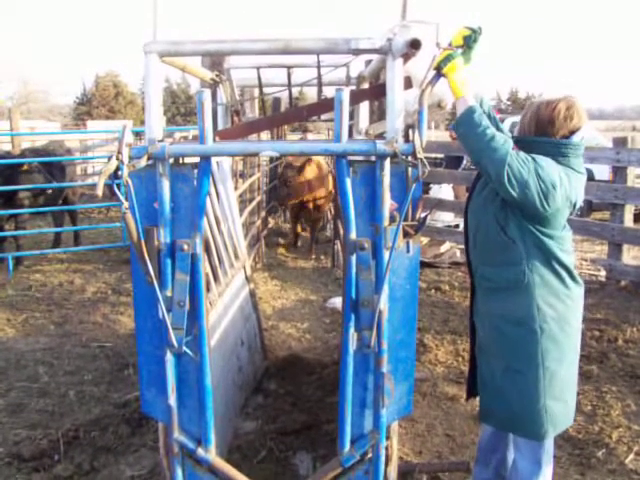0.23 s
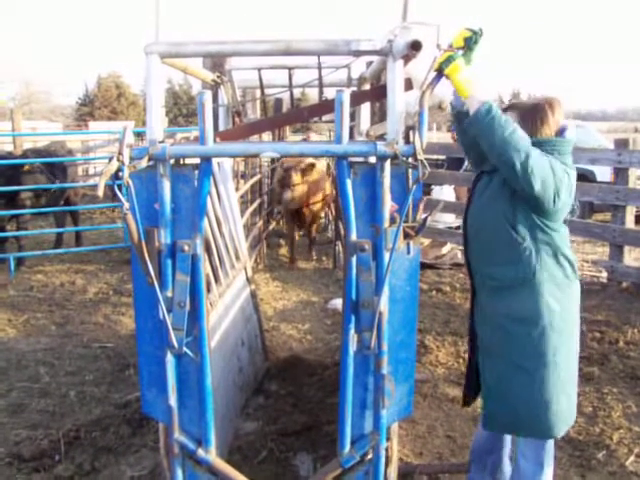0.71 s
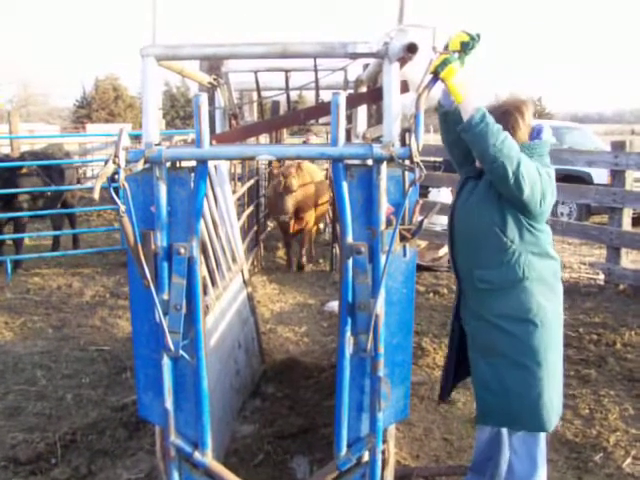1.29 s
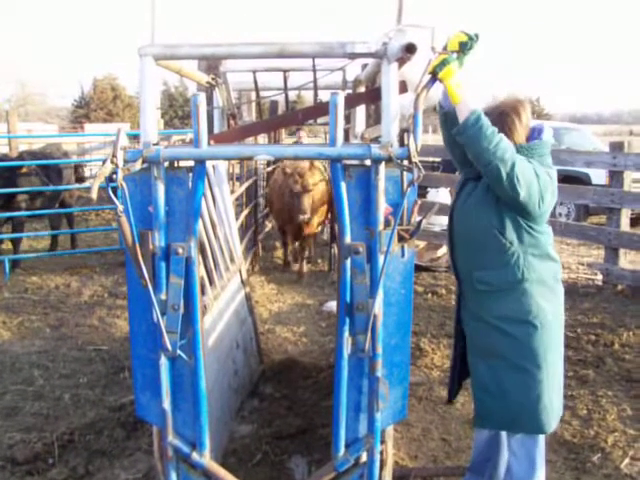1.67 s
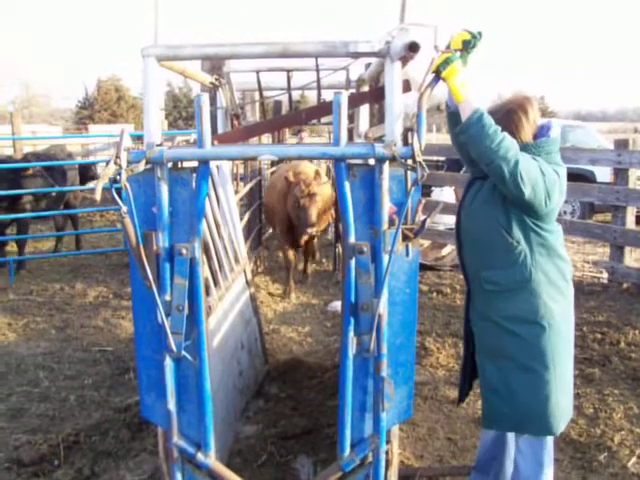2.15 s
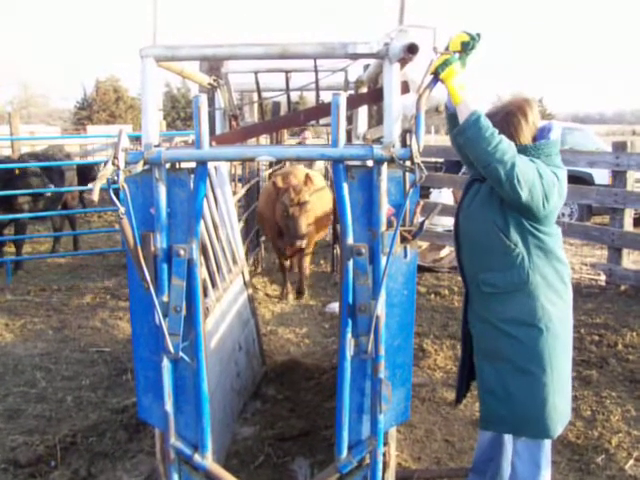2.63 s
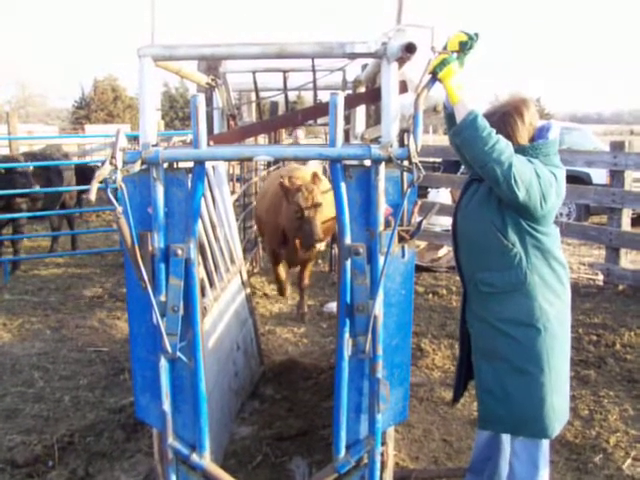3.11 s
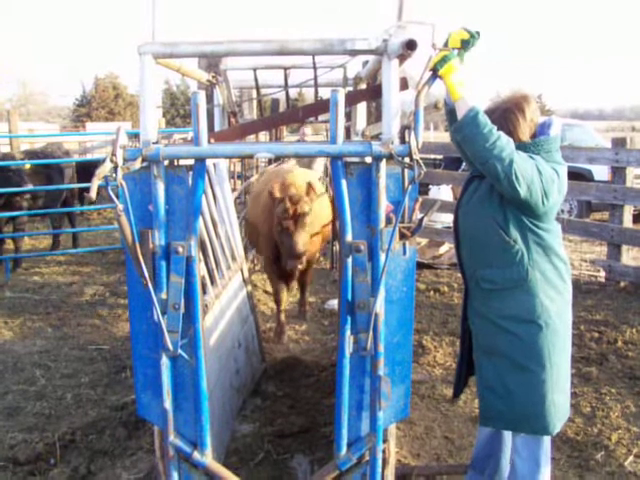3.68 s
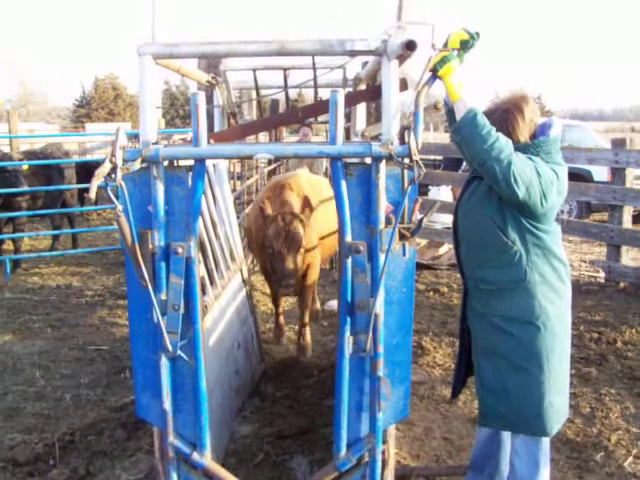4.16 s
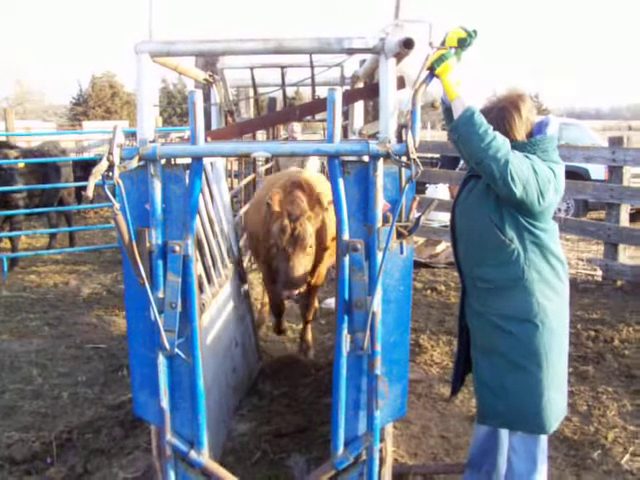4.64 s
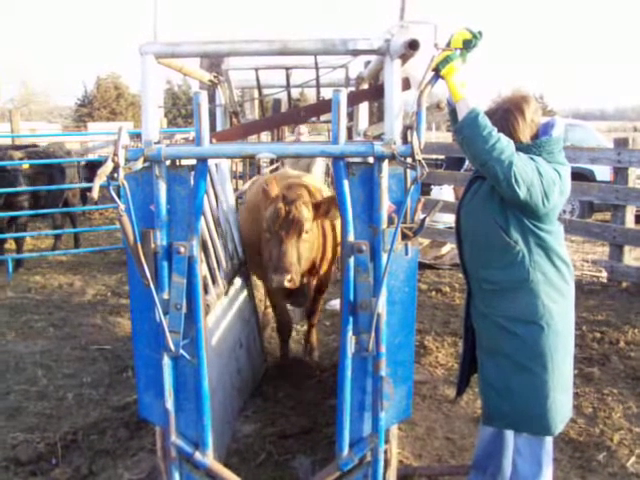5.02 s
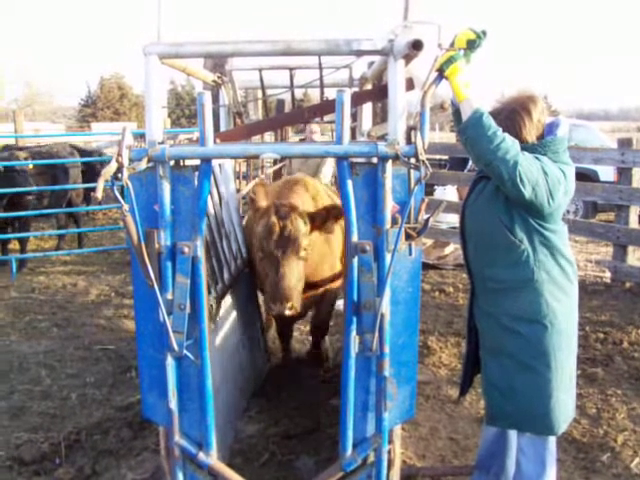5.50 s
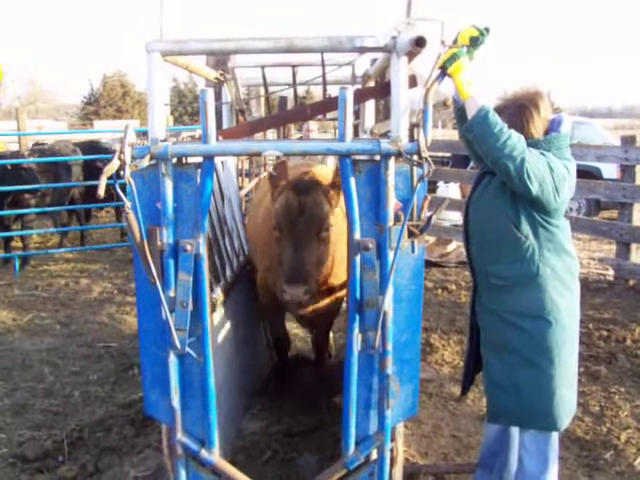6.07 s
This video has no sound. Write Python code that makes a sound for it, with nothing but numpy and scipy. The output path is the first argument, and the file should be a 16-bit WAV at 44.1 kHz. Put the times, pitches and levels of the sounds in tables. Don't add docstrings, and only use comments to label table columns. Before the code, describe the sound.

Low creaky moo, long rising moo breaking into a bellow, hard metal gate slam, latch chatter and a loud bang over a close moo.

```python
import sys
import numpy as np
from scipy import signal
from scipy.fft import rfft, irfft
from scipy.io import wavfile
from scipy.ndimage import uniform_filter1d

SR = 44100
rng = np.random.default_rng(int(sys.argv[2]) if len(sys.argv) > 2 else 0)


def voltage_ratio(level):
    return 10 ** (np.asarray(level, float) / 20)


def log_audio(samples):
    frames = np.atleast_2d(samples).T
    limited = np.clip(frames, -1, 1)
    pcm = np.round(limited * 32767).astype(np.int16)
    wavfile.write(sys.argv[1], SR, pcm)


N = 276948

# pitch_hz, density_db (per Hz)
YARD_SPECTRUM = [(59, -24), (100, 0.5), (378, -7), (423, -4.5), (456, -9), (615, -5), (650, -12),
                 (728, -12), (1210, -17), (1720, -16), (4820, -16), (8150, -26), (8780, -41.5),
                 (11400, -90), (19300, -120)]
# peak_s, width_s, level_db
GUSTS = [(.45, .2, 4.5), (1.75, .5, 5), (2.65, .35, 4.5), (5.2, .1, 7), (5.38, .25, 14), (5.6, .18, 15),
         (5.85, .2, 11), (6.3, .15, 7)]

# start_s, length_s, level_db, pitch_hz
SQUEAKS = [
    (.045, 0.046, -60, 5650),
    (.045, 0.051, -55, 4100),
    (1.42, 0.4, -61.5, 429),
    (.1, .02, -66, 5650),
    (.62, .05, -63, 4720),
]
# start_s, length_s, rms_db,
# pitch_hz, width_hz
SCUFFS = [(.04, 0.14, -55, 3700, 1200), (.29, .06, -49.5, 4630, 3000), (.35, 0.11, -58, 3500, 2000),
          (.62, 0.15, -59, 3700, 1200), (.78, .14, -58.5, 3750, 2000), (4.24, .13, -57, 3600, 700),
          (4.6, 0.24, -59, 3520, 2000), (4.91, 0.1, -46.5, 1460, 905), (4.97, 0.095, -56.5, 3700, 1200),
          (5.15, 0.03, -47, 4170, 4940), (5.225, 0.064, -49, 3000, 3000), (5.1, 0.27, -53.5, 940, 900),
          (5.3, 0.14, -44, 655, 150), (5.255, 0.12, -51, 2750, 3500), (5.885, .04, -36, 1000, 900),
          (6.21, .035, -36, 1300, 700), (6.215, .03, -42, 4200, 2000), (6.1, .025, -38, 2200, 700),
          (4.19, .03, -48, 1400, 1200), (5.85, .25, -53, 280, 120), (1.742, .014, -41, 4200, 700),
          (5.25, .25, -51, 480, 200), (5.153, .025, -45, 1200, 1500)]
# pitch_hz, width_hz, level_db
LATCH_MODES = [(2390, 350, 2.5), (2860, 300, 0.5), (3450, 260, 2.5), (4000, 400, 2), (1500, 900, -5),
               (5200, 1100, -12), (6300, 900, -23)]
# start_s, length_s, rms_db
LATCH_RATTLES = [
    (5.2574, .03, -38),
    (5.2929, .022, -29.5),
    (5.32, .03, -36.5),
    (5.357, .032, -32),
]
# start_s, peak_db, pitch_hz, t60_s
TICKS = [(.028, -33, 3000, .011), (.295, -33.5, 4970, .02), (1.0226, -26.5, 5600, .015),
         (1.5693, -22.5, 4500, .0066), (2.555, -28.5, 4907, .02), (4.3665, -29.5, 3500, .03),
         (4.963, -40, 7360, .047), (5.07, -35.5, 3600, .015), (5.134, -42, 4500, .01),
         (5.1946, -29, 4200, .011), (5.427, -35.5, 6670, .011), (1.7435, -37, 4200, .02),
         (5.174, -42, 5500, .008), (.53, -45, 3500, .01), (5.495, -43, 7000, .008), (5.525, -38, 7000, .01),
         (1.988, -44, 7500, .01)]
# start_s, peak_db, pitch_hz, t60_s
THUDS = [(4.342, -41, 396, .013), (5.163, -27, 160, .031), (5.192, -33, 250, .03), (4.968, -34, 300, .05),
         (6.068, -28, 550, .03), (6.108, -24, 900, .03), (5.55, -24, 124, .1), (5.9, -26, 700, .09),
         (6.15, -27, 92, .17)]
# start_s, peak_db, pitch_hz, t60_s
THROBS = [
    (3.722, -30, 222, .15),
    (4.214, -35, 240, .067),
]

# lag_s, level_db, pitch_hz, width_hz, t60_s
GATE = [(0, 0, 4200, 830, .0068), (.0027, -7, 4300, 1800, .019), (.0002, -18.5, 6720, 1800, .047),
        (.0022, -3.5, 800, 1000, .025), (.0092, -2.5, 417, 570, .016), (.0097, -5, 1216, 810, .024),
        (.0112, -8, 235, 170, .07), (.0042, -19, 135, 100, .15), (.0142, -13, 3730, 2200, .13),
        (.0142, -44, 616, 8, .9)]
PANEL = [(0, 0, 987, 490, .012), (.0027, -8, 1250, 670, .015), (.0007, -7, 2050, 800, .03),
         (.008, -12.5, 432, 510, .037), (.024, -18, 1330, 1500, .07), (.005, -19, 260, 120, .08),
         (.001, -42, 6900, 1200, .025), (.001, -21, 4000, 3500, .02)]
CHAIN = [(0, -19, 3960, 3000, .033), (.002, -8, 4900, 1200, .07), (.0042, 0, 3700, 800, .11),
         (.0015, -13, 6380, 1900, .1), (.0045, -12, 1500, 1400, .083)]
# start_s, peak_db, tilt_db (per octave about 1 kHz)
GATE_BLOWS = [
    (4.8858, -8.5, 0),
    (4.946, -31, -1),
]
PANEL_BLOWS = [
    (5.5428, -14, 8),
    (6.0848, -3.5, 0),
]
CHAIN_BLOWS = [
    (6.2405, -10, 1.5),
    (6.251, -14.5, 1),
    (6.263, -16, 1),
    (6.268, -16, 1),
]

# start_s, effort_db, strain_db (moves sound to the nose), throat_pose (0-1), chest_db
CREAK = [(1.0, -63, 3, .35, -70), (1.078, -54.5, 13, .38, -51), (1.264, -54, 15, .7, -58),
         (1.434, -53, 12, 1, -56), (1.71, -55, 10, .95, -57), (1.73, -56, 2, .95, -52),
         (1.8, -54, 5, .9, -59), (2.051, -58, 7, .8, -52), (2.401, -60, 6, .7, -60)]
RISE = [(1.738, -52, 8, .15, -56), (1.824, -44, 14, .08, -58), (1.99, -42.5, 10, .33, -55),
        (2.15, -46.5, 2, .32, -46), (2.54, -45.5, 5.5, .93, -44.5), (3.16, -42.5, 10.5, .78, -47.5),
        (3.56, -37, -2, .66, -33.5), (3.7, -39, -4.5, .58, -32), (3.718, -37, -9, .6, -44)]
BELLOW = [(3.712, -46, -2, 0, -36), (3.768, -32.5, -6.5, .12, -27), (3.84, -34.5, -3.5, .18, -28.5),
          (3.984, -27, -13.5, .5, -24), (4.064, -25.5, -13.5, .7, -25), (4.098, -29.5, -6, .71, -26),
          (4.152, -33.5, -7, .77, -30.5), (4.182, -39, -12, .7, -38), (4.215, -45, -3.5, .69, -41)]
NEAR = [(5.31, -40, 8, .17, -62), (5.35, -41.5, 4, .17, -56), (5.428, -33.5, .5, .35, -44),
        (5.532, -29, -1, .2, -39), (5.64, -30.5, -.5, .6, -32), (5.776, -29, -2.5, .77, -32.5),
        (5.9, -29, -5.5, .81, -31.5), (6.119, -29.5, -4, .77, -32.5), (6.28, -30.5, -2, .52, -32)]
# start_s, pitch_hz
CREAK_PITCH = [(1.0, 74.7), (1.078, 72), (1.264, 77.2), (1.42, 77.2), (1.688, 79.3), (1.74, 75.9),
               (1.8, 78.8), (2.051, 72.75), (2.401, 66.5)]
RISE_PITCH = [(1.738, 110), (2.504, 119.9), (2.674, 123.8), (2.9, 132.3), (3.138, 143.9), (3.21, 148.3),
              (3.5, 184.9), (3.584, 188.4), (3.718, 217.5)]
BELLOW_PITCH = [(3.712, 361.6), (3.78, 385.6), (3.84, 389), (3.984, 372.8), (4.064, 351.8), (4.098, 333),
                (4.152, 254.6), (4.182, 195), (4.215, 155)]
NEAR_PITCH = [(5.31, 109), (5.428, 139.6), (5.532, 154.4), (5.63, 164.9), (5.776, 175.4), (5.946, 179.9),
              (6.054, 178.8), (6.189, 172.8), (6.28, 166.1)]
# roughness at start, held, at end (0-1), settle_s, fail_s
CREAK_QUALITY = (.4, .36, .3, .1, .2)
RISE_QUALITY = (.32, .18, .45, .04, .05)
BELLOW_QUALITY = (.25, .05, .42, .04, .03)
NEAR_QUALITY = (.48, .1, .17, .06, .2)
# pose0_hz, pose1_hz, width_hz, pose0_db, pose1_db
CREAK_THROAT = [(730, 713, 120, -11, -8.5), (1420, 1370, 380, -11, -13), (2170, 2100, 120, -8.5, -18.5),
                (2905, 2787, 90, 1, -6.5), (3600, 3450, 500, -3, -11), (4200, 4050, 320, 1, -1.5),
                (5400, 4990, 280, -22, -12.5), (5930, 5800, 580, -17.5, -14)]
RISE_THROAT = [(287, 350, 100, -3, -14), (680, 787, 60, -8, -1.5), (1010, 1064, 320, -9.5, -1.5),
               (1380, 1330, 106, -6, -1), (1546, 1440, 255, 1.5, 0.5), (2005, 1804, 210, 1.5, 2),
               (2500, 2000, 430, -15.5, -29.5), (3046, 2970, 306, -10.5, -4), (3160, 3190, 284, -7.5, -6.5),
               (3740, 3614, 300, 4, -0.5), (4100, 4100, 220, 1, -7.5), (4824, 5070, 390, -17.5, -9),
               (5230, 5380, 320, -16.5, -12), (6020, 5700, 440, -22, -18.5)]
BELLOW_THROAT = [(800, 770, 150, -16, 2.5), (1165, 1052, 170, -3, 3.5), (1503, 1290, 280, -2, -9),
                 (1800, 1640, 260, 0, -11), (2830, 2250, 360, -5, -7.5), (3100, 3200, 220, 1, 4),
                 (3500, 3630, 366, -1.5, 6), (4200, 3780, 270, -2.5, 3), (4900, 5100, 420, -4, -8)]
NEAR_THROAT = [(753, 863, 143, -2.5, 4), (1110, 1040, 267, 0.5, 3), (1450, 1500, 320, 3.5, -1.5),
               (1757, 1648, 175, 7, -2), (2285, 2380, 190, -11, -5), (2800, 2750, 92, -12, -11.5),
               (3110, 3150, 111, -2, -3.5), (3750, 3650, 260, -6, -8.5), (4094, 3313, 490, -9.5, -12),
               (4750, 4750, 190, -16, -16.5), (5230, 5100, 190, -16, -9), (6030, 5250, 470, -28, -34)]
NOSE_POCKETS = {"rise": [(1800, 1753, 40), (2320, 2160, 430), (4600, 4240, 160)],
                "bellow": [(2230, 2780, 170), (6200, 6200, 750)], "near": [(464, 535, 64),
                (2110, 2160, 180), (4420, 4450, 89), (7200, 5900, 500)]}
# pitch_hz, level_db
CHEST = [(75, 0), (143, -3), (190, 9), (235, 4), (290, 1.5), (332, -18.5), (500, -29), (770, -.3)]


def evened(x):
    return x / np.sqrt(np.mean(x ** 2) + 1e-20)


def levelled(x, span_s=0.071):
    size = round(span_s * SR)
    power = uniform_filter1d(uniform_filter1d(x ** 2, size), size)
    return x / np.sqrt(power + 1e-12)


def add(mix, start_s, sound):
    part = mix[round(start_s * SR):][:len(sound)]
    part += sound[:len(part)]


def resonate(x, hz, width, order=2):
    turn = np.exp(2j * np.pi * np.cumsum(hz * np.ones(len(x))) / SR)
    r = np.exp(-np.pi * width / SR)
    smooth = signal.lfilter([(1 - r) ** order], np.poly([r] * order), x / turn)
    return 2 * (turn * smooth).real


def yard():
    hz = np.fft.rfftfreq(1024, 1 / SR)
    real, imag, patches = rng.standard_normal((N // 256 + 5, 513, 3)).T
    patches = evened(uniform_filter1d(uniform_filter1d(patches, 20, 0), 12, 1))
    f, db = np.transpose(YARD_SPECTRUM)
    density_db = np.interp(np.log(hz + 1), np.log(f + 1), db)[:, None]
    spectrum = (real + 1j * imag) * voltage_ratio(density_db + 1.2 * patches)
    return voltage_ratio(-52.5) * evened(signal.istft(spectrum, nperseg=1024, noverlap=768)[1][:N])


def wind():
    rumble = resonate(rng.standard_normal(N), 54, 98)
    t = np.arange(N) / SR
    gust_db = sum(db * np.exp(-(2 * (t - s) / width) ** 2) for s, width, db in GUSTS)
    return voltage_ratio(-57.5 + gust_db) * evened(rumble)


def squeak(length, db, hz):
    t = np.arange(round(length * SR)) / SR
    return voltage_ratio(db) * np.sqrt(2) * np.sin(2 * np.pi * hz * t) * signal.windows.tukey(len(t), .4)


def scuff(length, db, hz, width):
    noise, grit = rng.standard_normal((2, SR))[:, :round(length * SR)]
    grains = noise * voltage_ratio(1.9 * evened(uniform_filter1d(grit, 150)))
    return voltage_ratio(db) * evened(resonate(grains, hz, width)) * signal.windows.tukey(len(noise), .5)


def rattle(length, db):
    chance, size = rng.random((2, SR // 10))
    t = np.arange(SR // 10) / SR
    clicks = (chance < 2500 / SR) * (size - .3) * (t < length)
    clicks[0] = 1
    ring = sum(voltage_ratio(mode_db) * resonate(clicks, hz, width) for hz, width, mode_db in LATCH_MODES)
    return voltage_ratio(db) * ring / ring[:round(length * SR)].std()


def knock(db, hz, width, t60):
    t = np.arange(round((t60 + .01) * SR)) / SR
    force = rng.standard_normal(SR)[:len(t)] * voltage_ratio(-60 * t / t60)
    force[0] -= 9
    ring = resonate(force, hz, width)
    return voltage_ratio(db) * ring / abs(ring).max()


def single(rows, wide):
    return [(s, db, hz, hz * (wide if hz < 6300 else .15), t60) for s, db, hz, t60 in rows]


def strike(blows, part):
    return [(s + lag, db + patch_db + tilt * np.log2(hz / 1000), hz, width, t60)
            for s, db, tilt in blows
            for lag, patch_db, hz, width, t60 in part]


def panels(x, wet_db, t60):
    t = np.arange(SR // 4) / SR
    signs = rng.choice([-1., 1.], len(t))
    echoes = signs * (rng.random(len(t)) < 2000 / SR)
    tail = echoes * voltage_ratio(-60 * t / t60) * (t > .004)
    return x + voltage_ratio(wet_db) * signal.fftconvolve(x, tail / np.linalg.norm(tail))[:N]


def peak(f, hz, width):
    return 1 / (1 + 2j * (f[:, None] - hz) / width)


def promptest(gain):
    fold = irfft(np.log(gain + gain.max(0) / 1000), axis=0)
    fold[len(gain):] = 0
    return np.exp(2j * 1.3 * rfft(fold, axis=0).imag)


def fold_pulses(phase, hz):
    top = np.floor(8500 / hz)
    return (np.sin((top + .5) * phase) - np.sin(5 / 2 * phase)) / np.sin(phase / 2)


def throat_shapes(f, at, pose, lift_db, throat, pockets, split_hz, drift_db):
    shapes = np.zeros((2, len(f), len(at)), complex)
    for f0, f1, width, db0, db1 in throat:
        sway, slide = (np.interp(at, np.arange(40) * 0.1306, knots) for knots in rng.standard_normal((2, 40)))
        level_db = db0 + pose * (db1 - db0) + drift_db * sway + lift_db * (f0 > 4500)
        hz = (f0 + pose * (f1 - f0)) * (1 + slide / 250)
        shapes[int(f0 > split_hz)] += voltage_ratio(level_db) * peak(f, hz, width) ** 2
    for f0, f1, width in pockets:
        shapes *= 1 - peak(f, f0 + pose * (f1 - f0), width)
    return abs(shapes) / np.linalg.norm(shapes, axis=1, keepdims=True)


def moo(pitch, rows, quality, throat, pockets, split_hz, jitter, shimmer_db, airy, drift_db, lift_db,
        scoop_hz=0, shut_s=np.inf, limp_s=0):
    s, *columns = np.transpose(rows)
    t = np.arange(s[0], s[-1], 1 / SR)
    since_start, until_end = t - s[0], s[-1] - t
    hz = np.interp(t, *np.transpose(pitch)) - scoop_hz * np.exp(-since_start / .16)
    mouth_db, strain_db, pose, chest_db = (np.interp(t, s, c) for c in columns)
    nose_db = mouth_db + strain_db
    f, db = np.transpose(CHEST)
    one_db, two_db = (chest_db + np.interp(np.log(k * hz), np.log(f), db) for k in (1, 2))

    first, held, last, settle_s, fail_s = quality
    rough = held + (first - held) * np.exp(-since_start / settle_s)
    rough = rough + (last - held) * np.exp(-until_end / fail_s)
    rough = np.clip(rough - .008 * strain_db, 0, 1)
    pose = np.clip(pose, 0, 1)
    dull_s = .07
    lift_db = lift_db - 22 * np.exp(-since_start / dull_s) - 5.5 * np.clip((t - shut_s) / dull_s, 0, 1)

    wobble, swing, breath = rng.standard_normal((3 * SR, 3))[:len(t)].T
    turns = np.cumsum(hz * (1 + jitter * rough * evened(uniform_filter1d(wobble, 300)))) / SR
    phase = 2 * np.pi * turns
    folds = fold_pulses(phase, hz)
    folds *= voltage_ratio(shimmer_db * rough * swing[turns.round().astype(int)])
    folds *= voltage_ratio(-4.5 * np.clip((limp_s - t) / .04, 0, 1) * (turns.round() % 2))
    puffs = evened((0.59 + np.exp(-(turns % 1) / .3)) * breath)
    drives = [(1 - r) * levelled(folds) + r * puffs for r in (rough, np.minimum(airy * rough, 1))]

    f, at, z = signal.stft(np.array(drives), SR, nperseg=2048, noverlap=1792)
    pose, lift_db, *band_db = (np.interp(at, since_start, c) for c in (pose, lift_db, mouth_db, nose_db))
    shapes = throat_shapes(f, at, pose, lift_db, throat, pockets, split_hz, drift_db)
    prompt = promptest((shapes * voltage_ratio(np.array(band_db))[:, None]).sum(0))
    mouth, nose = signal.istft(z * shapes * prompt, SR, nperseg=2048, noverlap=1792)[1][:, :len(t)]

    hum = voltage_ratio(one_db) * np.sin(phase) + voltage_ratio(two_db) * np.cos(2 * phase)
    dropping = uniform_filter1d(swing[(turns / 2).astype(int)], 100)
    hum *= voltage_ratio(shimmer_db * rough ** 2 * dropping)
    voice = np.sqrt(2) * hum + voltage_ratio(mouth_db) * levelled(mouth) + voltage_ratio(nose_db) * levelled(nose)
    edges = np.clip(np.minimum(since_start, until_end + 0.0035) / 0.0029, 0, 1)
    return s[0] + .002, voice * edges


def scene():
    calls, steel = np.zeros((2, N))
    add(calls, *moo(CREAK_PITCH, CREAK, CREAK_QUALITY, CREAK_THROAT, [], split_hz=2400, jitter=0.0308,
                    shimmer_db=3, airy=1.75, drift_db=-0.45, lift_db=2.5, shut_s=1.32))
    add(calls, *moo(RISE_PITCH, RISE, RISE_QUALITY, RISE_THROAT, NOSE_POCKETS["rise"], split_hz=2250, jitter=0.012,
                    shimmer_db=3, airy=1.7, drift_db=1.1, lift_db=7.2, scoop_hz=28, shut_s=2.53))
    add(calls, *moo(BELLOW_PITCH, BELLOW, BELLOW_QUALITY, BELLOW_THROAT, NOSE_POCKETS["bellow"], split_hz=2150,
                    jitter=0.026, shimmer_db=9, airy=2.0, drift_db=2.0, lift_db=1.5, shut_s=3.92))
    add(calls, *moo(NEAR_PITCH, NEAR, NEAR_QUALITY, NEAR_THROAT, NOSE_POCKETS["near"], split_hz=2100, jitter=0.027,
                    shimmer_db=6, airy=2.0, drift_db=1.2, lift_db=1.5, limp_s=5.44))
    knocks = single(TICKS, wide=.75) + single(THUDS, wide=1.4) + single(THROBS, wide=.28)
    knocks += strike(GATE_BLOWS, GATE) + strike(PANEL_BLOWS, PANEL) + strike(CHAIN_BLOWS, CHAIN)
    for table, source in ((knocks, knock), (SCUFFS, scuff), (SQUEAKS, squeak), (LATCH_RATTLES, rattle)):
        for start_s, *row in table:
            add(steel, start_s, source(*row))
    steel = signal.sosfilt(signal.butter(2, 75, "high", fs=SR, output="sos"), steel)
    heard = panels(calls + steel, wet_db=-14, t60=.11)
    return (heard + yard() + wind())[None]


def roll_off(x):
    return signal.sosfilt(signal.butter(12, 8930, fs=SR, output="sos"), x)


def record(dry):
    dull = signal.sosfiltfilt(signal.butter(8, 8300, fs=SR, output="sos"), dry)
    return roll_off(dull)


dry = scene()
out = record(dry)
log_audio(out)
```